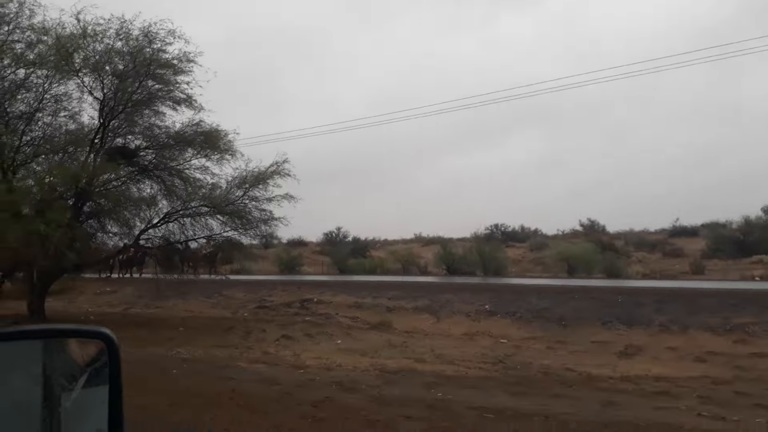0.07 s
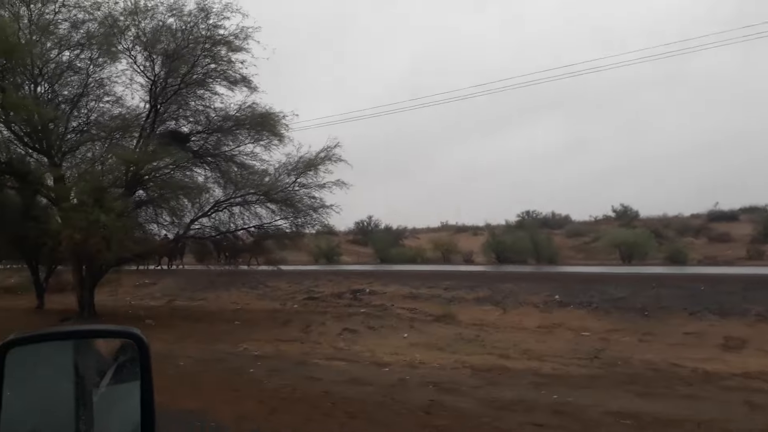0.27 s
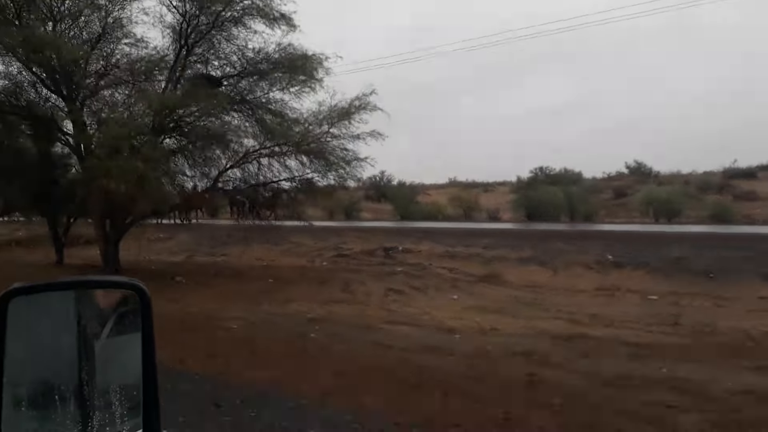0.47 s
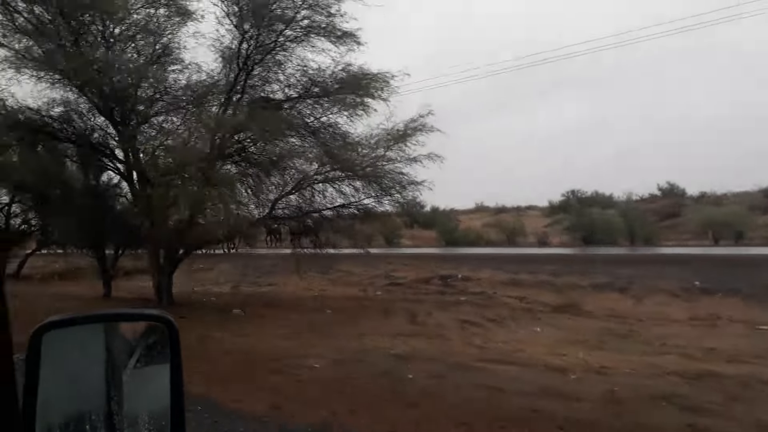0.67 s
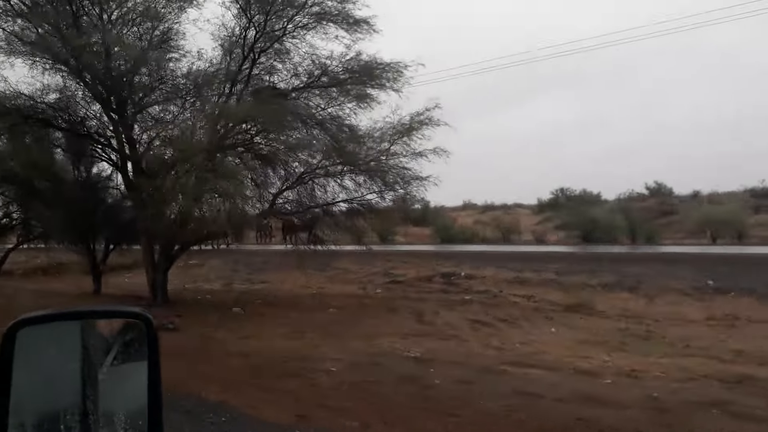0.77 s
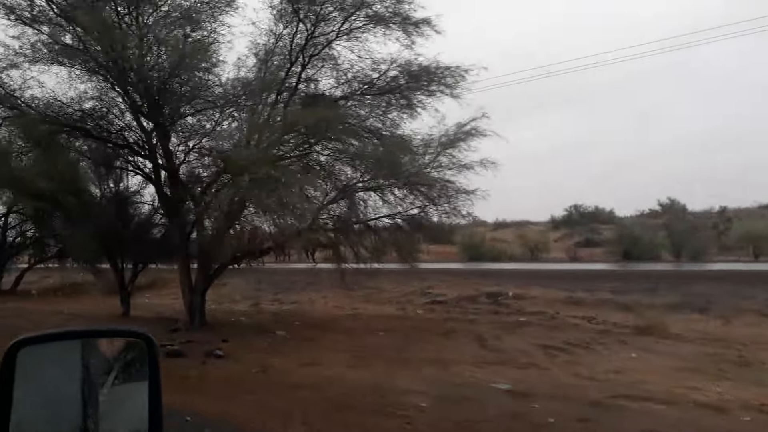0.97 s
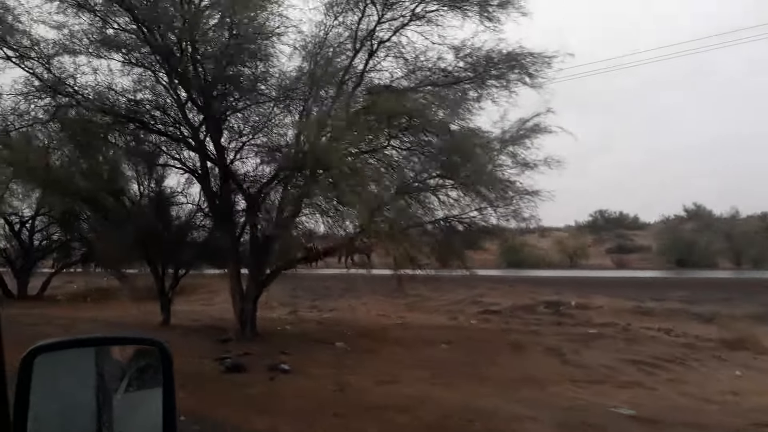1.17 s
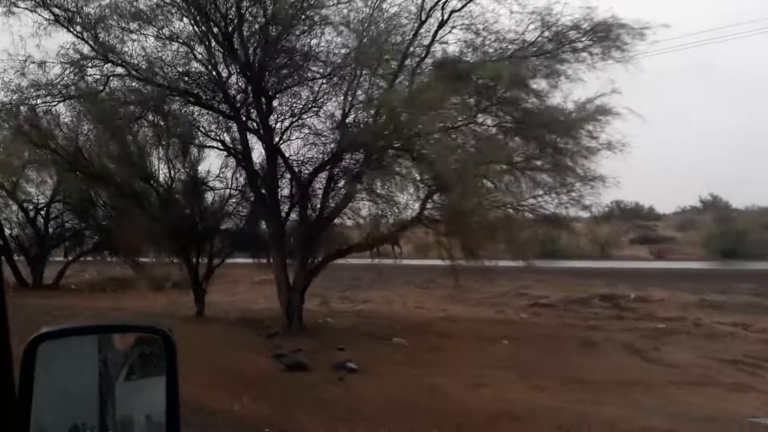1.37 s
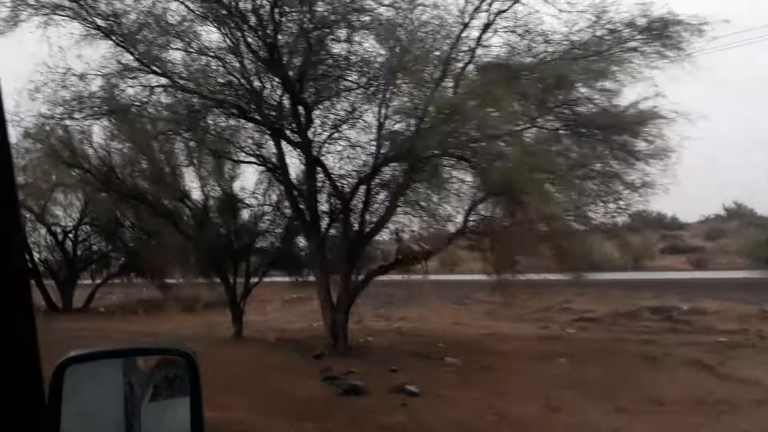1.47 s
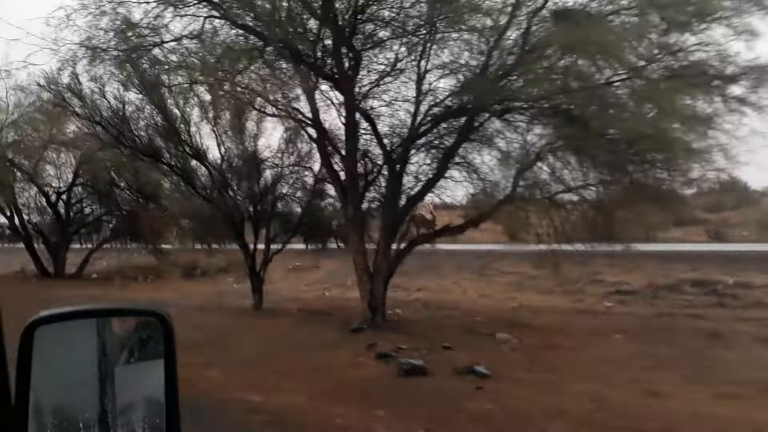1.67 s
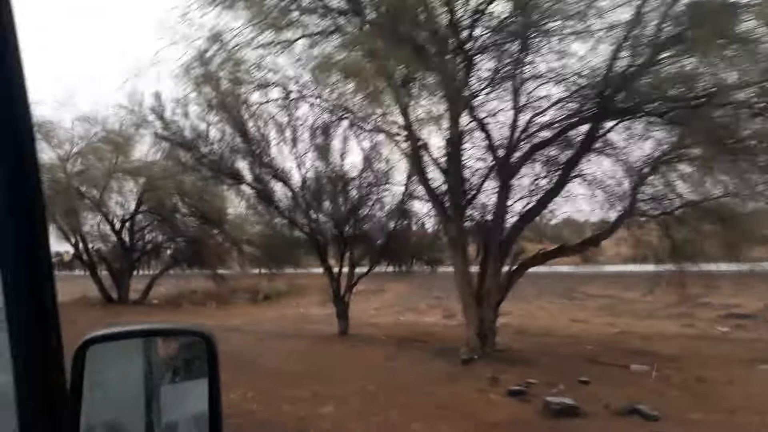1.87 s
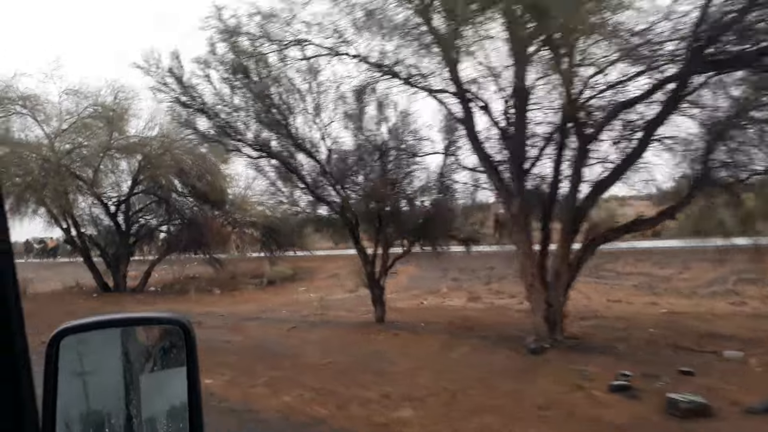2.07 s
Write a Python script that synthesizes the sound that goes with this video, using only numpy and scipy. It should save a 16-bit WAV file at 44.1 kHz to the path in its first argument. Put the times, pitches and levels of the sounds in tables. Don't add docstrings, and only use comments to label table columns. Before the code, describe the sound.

Wind buffeting hits a phone microphone at the open window of a slowly moving vehicle, hard at first, then in short uneven gusts over low engine hum and tyre roar, with grit ticking early on.

```python
import sys
import numpy as np
from scipy import signal
from scipy.io import wavfile
from scipy.ndimage import uniform_filter1d, minimum_filter1d

SR = 44100
rng = np.random.default_rng(int(sys.argv[2]) if len(sys.argv) > 2 else 0)


def ratio_of_db(decibels):
    return 10 ** (np.asarray(decibels, float) / 20)


def int16_out(signal):
    q = np.round(np.clip(np.atleast_2d(signal).T, -1, 1) * 32767)
    wavfile.write(sys.argv[1], SR, q.astype(np.int16))


N = 93977


def rms_one(x):
    return x / np.sqrt(np.mean(x ** 2) + 1e-20)


def butter(x, hz, kind, order=2):
    edges = np.clip(hz, 10, 0.45 * SR)
    return signal.sosfilt(signal.butter(order, edges, kind, fs=SR, output="sos"), x)


def drift(rate_hz):
    pole = np.exp(-40 * np.pi * rate_hz / SR)
    chance = rng.standard_normal(N // 20 + 2002)
    slow = rms_one(signal.lfilter([1], [1, -2 * pole, pole * pole], chance)[2000:])
    return np.interp(np.arange(N) / 20, np.arange(len(slow)), slow)


def banded_noise(spectrum, edges, shared_db, own_db):
    hz, db = np.transpose(spectrum)
    together = drift(9)
    white = rng.standard_normal((2, N + 4096))
    out = 0
    for k, pair in enumerate(zip(edges, edges[1:])):
        log_middle = np.log(np.prod(pair)) / 2
        level_db = np.interp(log_middle, np.log(hz), db)
        flicker_db = shared_db * together + own_db * drift(12)
        band = butter(white[k % 2], pair, "band")[4096:]
        out = out + ratio_of_db(level_db + flicker_db) * band
    return rms_one(out)


def engine():
    hz = 66.5 * (1 + 0.025 * drift(4))
    phase = 2 * np.pi * np.cumsum(hz) / SR
    return ratio_of_db(-27 + 2 * drift(6)) * np.sqrt(2) * np.sin(phase)


# frequency in Hz, level in dB per Hz.
ROAR_SPECTRUM = [(30, -37.5), (64, -2.5), (160, -5), (420, -26.5), (900, -23.5), (2000, -24.5), (3200, -42),
                 (5000, -60)]
# frequency in Hz, level in dB per Hz.
HISS_SPECTRUM = [(3500, 1), (5000, -10), (7100, 2.06), (8800, -4.5), (9400, -20), (12500, -14),
                 (15500, -25)]
# frequency in Hz, level in dB per Hz.
SPRAY_SPECTRUM = [(3000, -17), (4400, 1), (6000, -5), (10500, -6), (15500, -9)]
# time in seconds, level in dB.
NEARNESS = [
    (0, 6),
    (0.038, 2),
    (0.399, 4),
    (0.468, 0.5),
    (.75, -2),
    (1.051, -0.5),
    (1.15, 1),
    (1.7, 1.2),
    (2.13, 0.9),
]


def road():
    t = np.arange(N) / SR
    half_octaves = 25 * 2 ** np.arange(0, 8.1, 0.5)
    sixth_octaves = 3200 * 2 ** (np.arange(15) / 6)
    roar = ratio_of_db(-28.5) * banded_noise(ROAR_SPECTRUM, half_octaves, shared_db=0.5, own_db=1.98)
    hiss = ratio_of_db(-51.5) * banded_noise(HISS_SPECTRUM, sixth_octaves, shared_db=1.1, own_db=1.4)
    spray = banded_noise(SPRAY_SPECTRUM, sixth_octaves[::2], shared_db=1.4, own_db=1.5)
    spray_db = -61 - 9 * (t > 0.43)
    nearness = ratio_of_db(np.interp(t, *np.transpose(NEARNESS)))
    return nearness * (roar + hiss) + ratio_of_db(spray_db) * spray


# start in seconds, peak in dB, ring in Hz, width of the ring in Hz.
GRIT_TICKS = [(0.09, -45, 9100, 9250), (.1221, -49, 10800, 1140), (.1911, -38, 6150, 4260),
              (0.2386, -23, 6040, 4850), (.2393, -57.5, 12800, 5000), (.2436, -39, 8000, 9000),
              (.2631, -34, 5920, 6790), (0.4147, -39, 7040, 5290), (.7658, -40, 6140, 7000),
              (.7897, -38, 4100, 2380), (0.9461, -41.5, 6981, 11000), (1.103, -35, 7200, 6000),
              (1.1032, -60, 12730, 900), (1.148, -38, 6440, 4700), (1.3887, -48.5, 9600, 3880),
              (1.6281, -46, 8800, 1948), (1.6651, -51, 12100, 800), (1.8301, -51, 11660, 902),
              (2.0119, -42, 7300, 4920)]


def grit():
    cycles, shortest_s = 11, 0.002
    t = np.arange(2000) / SR
    noise = rng.standard_normal((len(GRIT_TICKS), 2000))
    out = np.zeros(N + 2000)
    for (start_s, db, hz, width), puff in zip(GRIT_TICKS, noise):
        puff = rms_one(butter(puff, [hz - width / 2, hz + width / 2], "band"))
        decay_s = max(cycles / width, shortest_s)
        first = int(start_s * SR)
        out[first:first + len(t)] += ratio_of_db(db - 3.5) * puff * np.exp(-t / decay_s)
    return out[:N]


# time in seconds, peak in dB.
PORT_SLAPS = [(0.021, -14), (0.043, -6.5), (0.076, -6), (0.186, -14), (0.216, -4.5), (0.334, -18),
              (0.417, -7), (0.446, 2.5), (0.505, -6.5), (0.623, -12.5), (0.739, -14), (0.853, -8.5),
              (0.951, -11), (0.967, -5.5), (1.066, -10.5), (1.097, -20), (1.145, -16), (1.185, -11),
              (1.209, -4.5), (1.297, -20), (1.399, -8), (1.492, -15), (1.515, -9), (1.64, -1.5),
              (1.67, -10), (1.72, -17), (1.804, -19.5), (1.968, -16), (1.997, -8), (2.118, -15.5),
              (0.064, -3), (0.082, -6.5), (0.107, -12), (0.194, -12), (0.347, -1.5), (0.474, -8.5),
              (0.522, -16), (0.809, -10), (0.874, -27), (0.996, -13), (1.224, -14), (1.239, -15),
              (1.273, -7), (1.414, -8.5), (1.534, -10), (1.552, -8), (1.631, -4), (1.652, -6), (1.695, -11),
              (1.757, -27), (1.814, -17), (1.845, -12), (1.886, -24), (2.016, -11)]


def slap_shape(clicks):
    return butter(butter(clicks + 1e-18, 300, "high"), 889, "low", order=4)


def slaps():
    lead_s, gap_s, loss_db, level_db = 0.001198, 0.0032, 5.5, -4.5
    hits = PORT_SLAPS
    chance = rng.random((len(hits), 3, 3))
    clicks = np.zeros(N + SR)
    for (time_s, db), run in zip(hits, chance):
        gaps = gap_s * (0.5 + run[:, 0])
        at = time_s + lead_s + np.cumsum(gaps) - gaps[0]
        eddy_db = db + level_db - loss_db * np.arange(len(at)) * 2 * run[:, 1]
        push_or_pull = np.where(run[:, 2] < 0.7, 1, -1)
        clicks[(at * SR).astype(int)] += ratio_of_db(eddy_db) * push_or_pull
    one_slap = slap_shape(np.eye(1, 999)[0])
    return slap_shape(clicks[:N]) / np.abs(one_slap).max()


def evened(x):
    power = uniform_filter1d(x ** 2, int(0.013 * SR)).clip(0.02)
    return rms_one(x / power ** (0.85 / 2))


def eddy_row():
    tight_per_s, spread_db, tight_share = 300, 3, 0.45
    count = 2 * N + 8
    smooth = rng.standard_normal(count)
    present = rng.random(count) < tight_per_s / SR
    size = np.minimum(rng.exponential(1, count), 3)
    lone = rms_one(present * ratio_of_db(spread_db * size) * np.sign(smooth + 0.5))
    mixed = np.sqrt(1 - tight_share) * smooth + np.sqrt(tight_share) * lone
    return butter(butter(mixed, 196, "low", order=1), 549, "low", order=4)


# centre in seconds, half width in seconds, level in dB,
# rate at which eddies pass in Hz.
WIND_GUSTS = [(0.056, 0.023, -7.5, 281.9), (0.097, 0.04, -15, 300.0), (0.208, 0.017, -10.5, 281.5),
              (0.301, 0.056, -16, 269.3), (0.351, 0.0099, -11, 309.1), (0.44, 0.02038, -8.5, 300.0),
              (0.498, 0.023, -10.5, 300.0), (0.624, 0.016, -16, 268.8), (0.681, 0.0068, -25, 240.8),
              (0.744, 0.013, -15, 300.0), (0.791, 0.018, -12, 199.4), (0.866, 0.019, -13, 329.9),
              (0.971, 0.025, -14.5, 330.8), (1.065, 0.023, -15, 242.7), (1.1, 0.01211, -13.5, 197.9),
              (1.143, 0.011, -15, 370.3), (1.216, 0.02836, -9.5, 289.7), (1.276, 0.00932, -14, 200.6),
              (1.299, 0.013, -13.5, 300.0), (1.337, 0.008, -18, 200.2), (1.418, 0.017, -13.5, 273.3),
              (1.52, 0.0269, -15.5, 349.2), (1.55, 0.012, -15, 312), (1.66, 0.025, -12, 401.6),
              (1.753, 0.0378, -17.5, 233.4), (1.818, 0.012, -11, 231.4), (1.849, 0.0088, -14, 280.2),
              (1.982, 0.018, -9.5, 243.3), (2.023, 0.024, -18, 300.0), (2.134, 0.0077, -7, 253.3)]


def gust_power(wider):
    t = np.arange(N) / SR
    tail_longer = 1.25
    rows = []
    for centre_s, half_s, db, _ in WIND_GUSTS:
        side = np.where(t > centre_s, tail_longer, 1 / tail_longer)
        rows.append(ratio_of_db(2 * db) * np.exp(-((t - centre_s) / (half_s * wider * side)) ** 2))
    return np.array(rows)


def wind():
    usual_hz = 300
    power = gust_power(0.99)
    lull = ratio_of_db(2 * -34.5)
    total = power.sum(axis=0) + lull
    flutter_db = 1.62 * drift(49.6)
    gust_db = 10 * np.log10(total) + flutter_db
    passing_hz = (np.array(WIND_GUSTS)[:, 3] @ power + 0.76 * usual_hz * lull) / total
    octaves = 0.016 * (gust_db + 14) + 0.06 * flutter_db
    speed = np.clip((passing_hz / usual_hz) ** 0.8 * 2 ** octaves, 0.3, 2)
    row = eddy_row()
    passing = np.interp(np.cumsum(speed), np.arange(len(row)), row)
    small = evened(butter(passing, 133, "high"))
    small = small + 0.1 * (small ** 2 - uniform_filter1d(small ** 2, size=600))
    big = evened(butter(rng.standard_normal(N), 140.4, "low"))
    swell = ratio_of_db(-4) * np.sqrt(gust_power(0.93).sum(axis=0))
    return ratio_of_db(gust_db - 0.35) * small + swell * big


def scene():
    return (engine() + road() + grit() + slaps() + wind())[None]


def limiter(x):
    top, release_db_per_s, attack_s = 0.93, 350, 0.0025
    ramp = release_db_per_s * np.arange(N) / SR
    span = int(attack_s * SR)
    over_db = 20 * np.log10(np.maximum(np.abs(x) / top, 1))
    held_db = np.maximum(np.maximum.accumulate(over_db + ramp) - ramp, 0)
    gain_db = uniform_filter1d(minimum_filter1d(-held_db, 2 * span + 1), span)
    return x * ratio_of_db(gain_db)


def band_limit(x):
    return signal.sosfilt(signal.butter(12, 15830, fs=SR, output="sos"), x)


def record(dry):
    thinned = butter(dry[0], 65.3, "high", order=3)
    mix = limiter(thinned)[None]
    return band_limit(mix)


dry = scene()
out = record(dry)
int16_out(out)
```